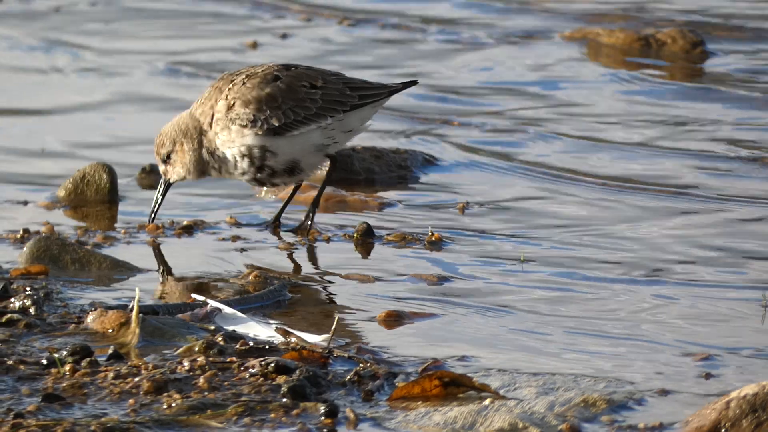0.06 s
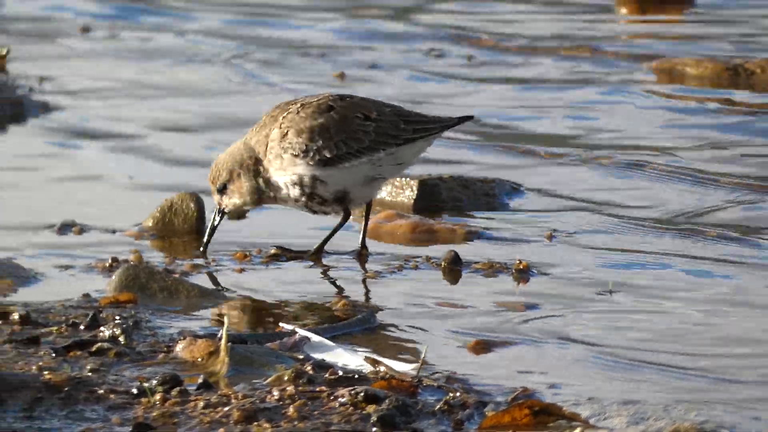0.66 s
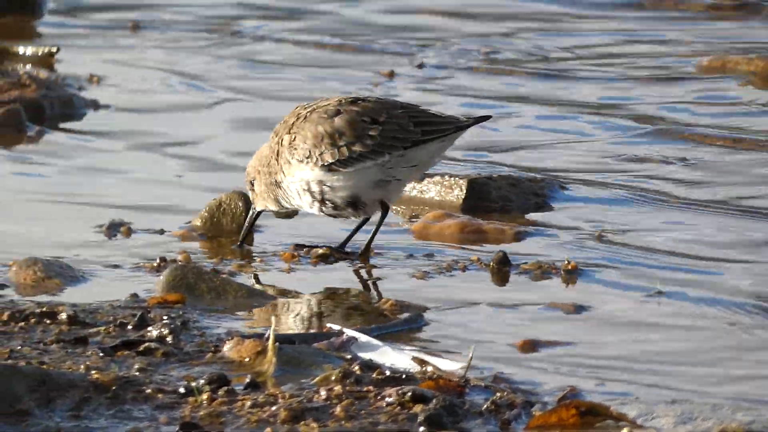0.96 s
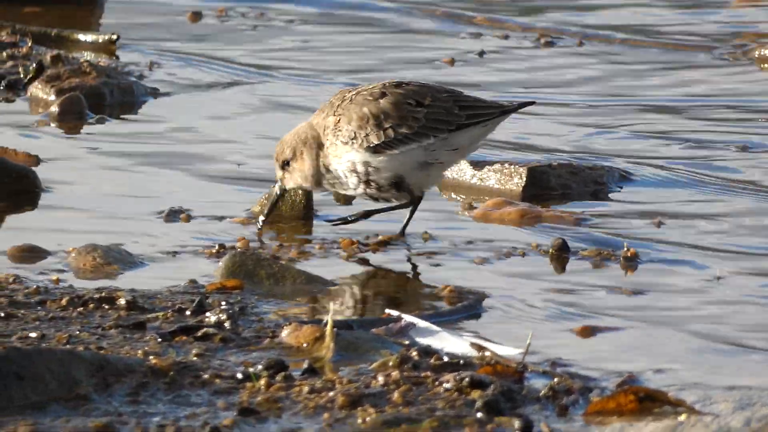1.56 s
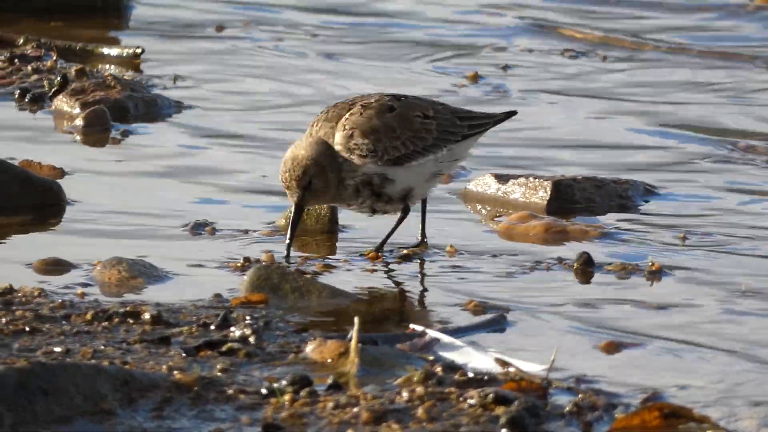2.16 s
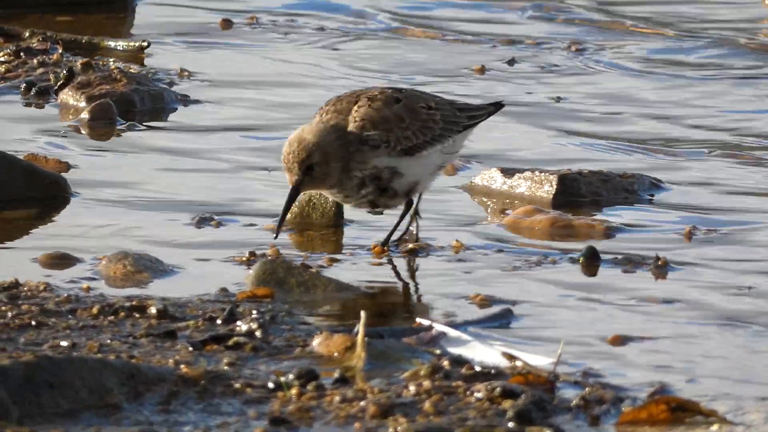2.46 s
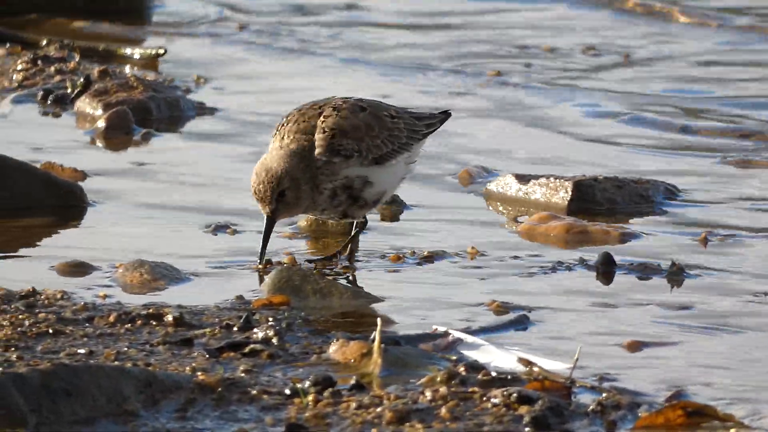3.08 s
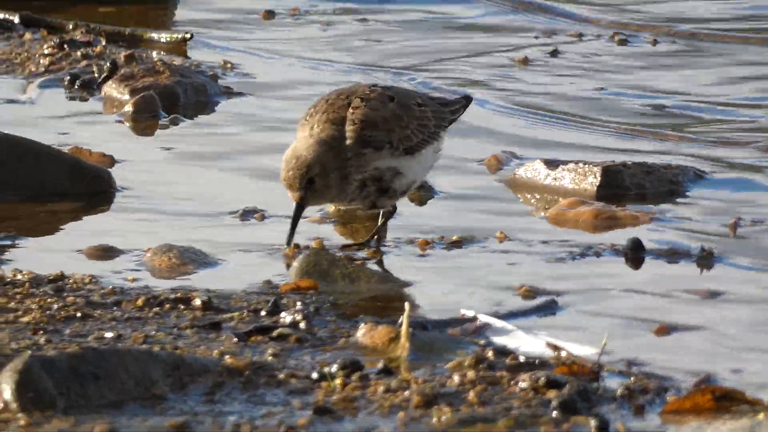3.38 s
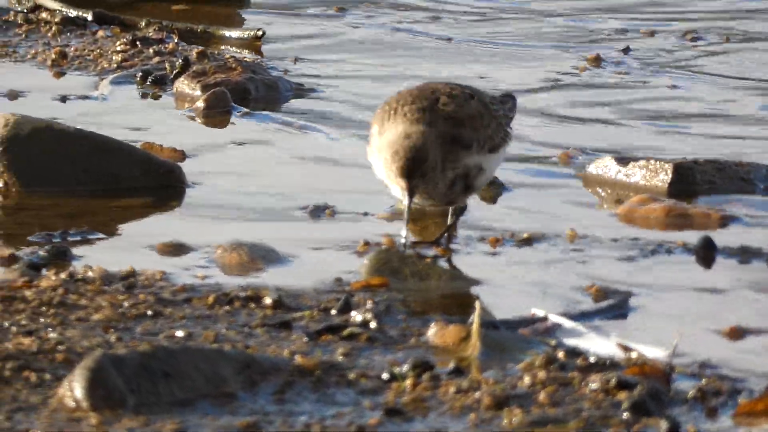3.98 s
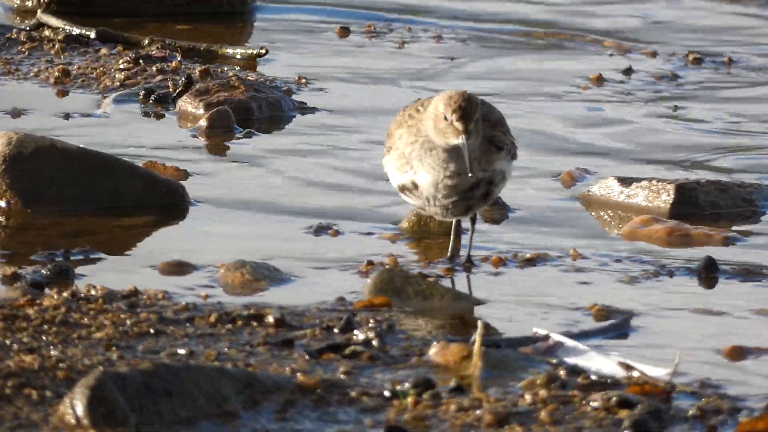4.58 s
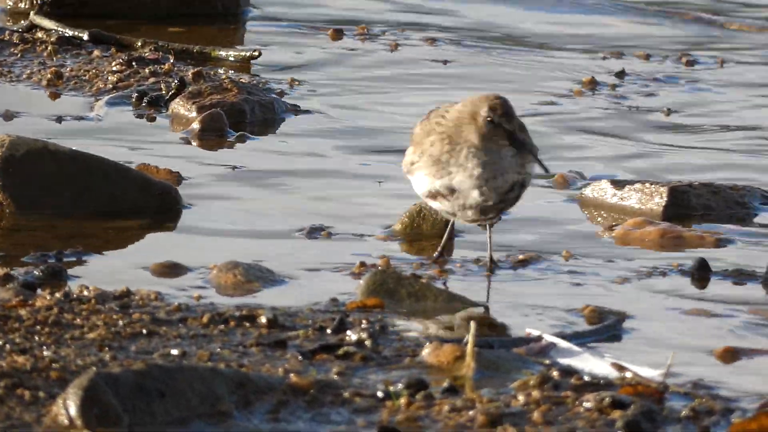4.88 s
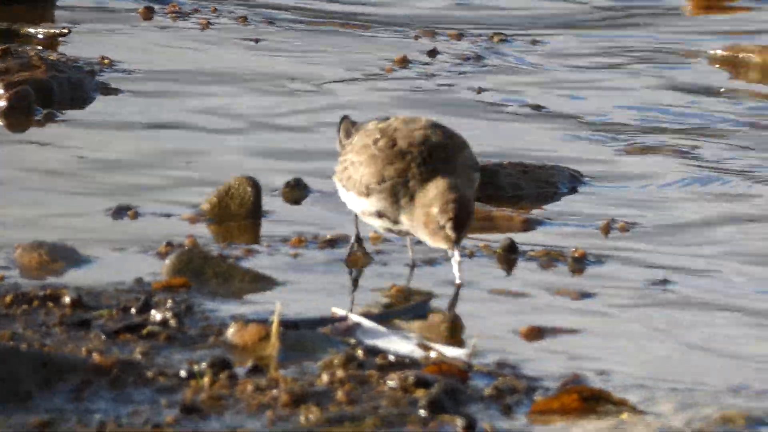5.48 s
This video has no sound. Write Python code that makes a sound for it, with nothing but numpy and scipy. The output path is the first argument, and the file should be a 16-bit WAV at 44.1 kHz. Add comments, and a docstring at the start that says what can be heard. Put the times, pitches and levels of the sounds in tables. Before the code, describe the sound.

After a moment of silence, the sound cuts in at about 0.3 seconds with a click, mostly on the right. Wind on an open muddy shore immediately buffets the microphone, making a low, rough rumble with fluttering rushes and dull thumps that shift between left and right. It is strongest and brightest around 0.9 seconds, with further gusts near 1.6 seconds and from 2.1 to 2.7 seconds. From about 3 seconds the wind slackens and turns deeper and lumpier, with separate bumps, surges and short lulls. It swells briefly near 4.2 seconds, is weakest between 4.5 and 5 seconds, then builds again with firm thumps around 5.4 and 5.6 seconds. Throughout, a faint, very rapid crackle of dry ticks thickens with the buffets, a few ticks standing out singly, and a very thin hiss lies beneath everything.

```python
"""A muddy shore, where wind buffets the two microphone ports of a camera; the sound cuts in with a click.
Turbulence acts as fluctuating pressure: large eddies rumble in both ports, smaller ones batter each
alone, and the finest flutter and rush in bursts. Strong wind is brighter; slack wind is deep and lumpy,
with single thumps, surges and lulls. Faint dry ticks fall on an even beat, about 94 a second, and
cluster with the buffets; under them lies a thin hiss."""
import sys
import numpy as np
from scipy import signal
from scipy.fft import rfft, irfft, next_fast_len
from scipy.io import wavfile
from scipy.ndimage import uniform_filter1d, map_coordinates

SR = 44100
rng = np.random.default_rng(int(sys.argv[2]) if len(sys.argv) > 2 else 0)


def materialize(psi):
    """Save the field psi as 16-bit PCM at rate SR to the path in sys.argv[1].

    A 1-D psi becomes a single channel; in a 2-D psi each row is a channel.
    """
    bounded = np.clip(np.atleast_2d(psi).T, -1, 1)
    quanta = np.round(bounded * 32767).astype(np.int16)
    wavfile.write(sys.argv[1], SR, quanta)


N = 248724


def amp(db):
    """Amplitude ratio of a level: tenfold for every 20 dB."""
    return 10 ** (np.asarray(db) / 20)


def unit_rms(x):
    """Normalisation to a mean square of one."""
    return x / np.sqrt(np.mean(x ** 2) + 1e-20)


def at_frequency(table, hz):
    """Interpolation on a logarithmic frequency axis."""
    f, values = np.transpose(table)
    return np.interp(np.log(hz + 1), np.log(f + 1), values)


def over_time(table):
    """Linear interpolation in time, one value a sample."""
    t, values = np.transpose(table)
    return np.interp(np.arange(N) / SR, t, values)


def wobble(rate):
    """Smooth random process: a spline through Gaussian knots, rate of them a second."""
    knots = rng.standard_normal(int(N * rate / SR) + 4)
    return map_coordinates(knots, [np.arange(N) * rate / SR])


def averaged(x, span_s):
    """A moving average smooths out fluctuations shorter than its span."""
    return uniform_filter1d(x, max(int(span_s * SR), 64))


def filtered(x, response):
    """Linear filtering: the spectrum is multiplied by a frequency response."""
    size = next_fast_len(N + SR // 2)
    return irfft(rfft(x, size) * response(np.fft.rfftfreq(size, 1 / SR)), size)[..., :N]


def panned(lean_db):
    """Constant-power law: two gains for a left-right level difference."""
    gains = amp(np.array([lean_db, -lean_db]) / 2)
    return gains / np.sqrt(np.mean(gains ** 2, axis=0))


def opening_click(age, level_db, decay_s, pitch_hz):
    """A pressure step dies away as a heavily damped oscillation, mostly on the right."""
    ring = np.exp(-age / decay_s) * np.cos(2 * np.pi * pitch_hz * age)
    return -amp(level_db) * (age > 0) * ring * panned(-11.5)[:, None]


# Likeness of the channels, greatest in the upper bass: f/Hz, correlation (-1 to 1)
CORRELATION = [(45, -0.34), (85, 0.37), (120, 0.54), (170, 0.98), (250, 0.68), (330, 0.39), (470, -0.14),
               (680, -0.43), (1000, -0.51), (2000, -.45), (3200, 0.026), (9000, 0.3)]


def stereo_pair(ports, spectrum):
    """Mid-side stereo: the balance of the ports' sum and difference sets the correlation."""
    def response(hz):
        angle = np.arccos(np.clip(at_frequency(CORRELATION, hz), -0.98, 0.98)) / 2
        return amp(at_frequency(spectrum, hz)) * [np.cos(angle), np.sin(angle)]

    mid, side = filtered(np.array([ports[0] + ports[1], ports[0] - ports[1]]), response)
    return unit_rms(np.array([mid + side, mid - side]))


def eddies(spectrum, bursts_db, span_s):
    """Intermittency: turbulent pressure comes in bursts, while its mean power over span_s holds steady."""
    pressure = stereo_pair(rng.standard_normal((2, N)) * amp(bursts_db), spectrum)
    power = np.mean(pressure ** 2, axis=0)
    mean_power = averaged(averaged(power, span_s), span_s)
    return pressure / np.sqrt(np.abs(mean_power) + 1e-9)


# Strength of the wind about its mean: t/s, level/dB
WIND_STRENGTH = [(0.33, 2), (0.55, 5.0), (0.9, 7), (1.02, 5.5), (1.2, 3.5), (1.45, 2), (1.62, 5), (1.82, 2),
                 (2.15, 5), (2.65, 4), (2.85, -0.5), (3.05, 1), (3.19, -4.5), (3.28, 1), (3.55, -5),
                 (3.72, -3), (3.95, -3), (4.22, 2), (4.45, -5), (4.58, -8.5), (4.74, -5), (4.98, -9),
                 (5.15, -5), (5.4, -1), (5.6, 1.5)]
# Lean of the wind toward one port, scaled for each eddy size: t/s, left-right level/dB
WIND_LEAN = [(0.4, 5.5), (1.1, 0), (1.7, -2), (1.85, 3.5), (2.3, 1.5), (2.9, 5.5), (3.35, 7), (3.55, -1.5),
             (4.15, 1.5), (4.7, 4), (4.95, -3.5), (5.1, 9), (5.38, -4), (5.55, 2)]
# Spectra of the eddies, largest to finest: f/Hz, relative level/dB
THROB_SPECTRUM = [(15, -28.5), (40, -22.5), (62, -13.5), (85, -5), (110, 4), (135, -0.5), (190, -30),
                  (400, -77)]
RUMBLE_SPECTRUM = [(50, -41.5), (95, -21), (125, -3.5), (165, 0.6), (225, -0.04), (300, -5), (450, -24.5),
                   (900, -88)]
BUFFET_SPECTRUM = [(100, -34.5), (190, -8.5), (270, -1.5), (380, 1), (490, -2.5), (620, -12.5),
                   (800, -25.5), (1200, -47.5), (2500, -89)]
FLUTTER_SPECTRUM = [(250, -31.5), (480, -0.5), (650, 4), (800, -1.5), (1000, -7), (1400, -19.5),
                    (2000, -37), (2800, -54), (5000, -87)]
RUSH_SPECTRUM = [(600, -22.5), (1100, -1.5), (1500, -3), (2000, -8.5), (2400, -16.5), (2900, -28.5),
                 (4000, -37.5), (8500, -53.5), (15000, -67.5)]


def wind(swirl):
    """Turbulence: smaller eddies sound higher, and more wind shifts the power from large to small."""
    wind_db, lean_db = over_time(WIND_STRENGTH), over_time(WIND_LEAN)
    throb = eddies(THROB_SPECTRUM, 0.8 * swirl, span_s=0.1)
    rumble = eddies(RUMBLE_SPECTRUM, 1.2 * swirl, span_s=0.14)
    buffet = eddies(BUFFET_SPECTRUM, 2.5 * swirl, span_s=0.085)
    flutter = eddies(FLUTTER_SPECTRUM, 3.2 * swirl, span_s=0.098)
    rush = eddies(RUSH_SPECTRUM, 2.5 * swirl + 4.8 * wobble(260), span_s=0.085)
    # Each size has a level in the mean wind and a slope in dB per dB of wind.
    return (throb * amp(-39.5 - 0.33 * wind_db) * panned(-1.8)[:, None]
            + rumble * amp(-28.0 + 0.29 * wind_db) * panned(0.1)[:, None]
            + buffet * amp(-25.0 + 0.42 * wind_db) * panned(0.58 * lean_db + 2.0)
            + flutter * amp(-37.5 + 1.175 * wind_db) * panned(1.2 * lean_db - 3.5)
            + rush * amp(-61.5 + 0.78 * wind_db) * panned(0.41 * lean_db - 0.1))


# Envelope common to the ticking and the fizz: t/s, level/dB
CRACKLE_LEVEL = [(0.33, -73.5), (0.66, -74.5), (0.88, -73), (1.2, -73), (1.45, -77), (1.85, -80),
                 (2.5, -77.5), (3.2, -80), (3.3, -76), (3.8, -82), (4.45, -79.5), (5.0, -83.5),
                 (5.4, -76.5), (5.6, -83.5)]
# Spectra of a tick and of the fizz between ticks: f/Hz, relative level/dB
TICK_SPECTRUM = [(400, -13), (1500, 4.5), (3000, 3), (4000, -2.5), (5000, -10), (6500, -18), (8500, -26.5),
                 (15000, -44)]
FIZZ_SPECTRUM = [(1200, -24), (2600, 1.5), (4000, -2.5), (6000, -7.5), (8500, -14.5), (15000, -29.5)]


def crackle(swirl, rate_hz, first_s, scatter_db, tick_db, fizz_db):
    """Amplitude modulation: eddies swell a periodic train of ticks; a fine fizz thickens in the gusts."""
    beats = np.round(np.arange(first_s, (N - 1) / SR, 1 / rate_hz) * SR).astype(int)
    draws = rng.uniform(-0.47, 1, (len(beats), 4)).T
    height, scatter = draws[:2], draws[2:]
    train = np.zeros((2, N))
    train[:, beats] = height * amp(scatter_db * scatter + 1.2 * swirl[:, beats])
    ticking = unit_rms(filtered(train, lambda hz: amp(at_frequency(TICK_SPECTRUM, hz))))
    fizz = eddies(FIZZ_SPECTRUM, 2.0 * swirl, span_s=0.04)
    fizz_gain = amp(fizz_db + 0.45 * over_time(WIND_STRENGTH))
    return amp(over_time(CRACKLE_LEVEL)) * (amp(tick_db) * ticking + fizz_gain * fizz)


def power_ratio(air, quick_s, slow_s):
    """Short-term over long-term mean-square pressure: how hard the air presses just now."""
    power = np.mean(air ** 2, axis=0)
    quick, slow = (np.abs(averaged(power, span_s)) + 1e-9 for span_s in (quick_s, slow_s))
    return quick / slow


# Spectrum of the microphones' hiss: f/Hz, relative level/dB
HISS_SPECTRUM = [(100, 3), (2500, 3.5), (5000, 3), (8300, -8), (9800, 4), (11500, -3), (15500, -7.5)]


def hiss(level_db):
    """Self-noise: the microphones add a thin, stationary broadband hiss."""
    return amp(level_db) * stereo_pair(rng.standard_normal((2, N)), HISS_SPECTRUM)


# Single eddies rolling over the ports: t/s, half duration/s, lift/dB, centre f/Hz
EDDY_SURGES = [(0.318, 0.027, 5.5, 379), (0.566, 0.015, 4, 637), (0.672, .04, 3, 3000),
               (0.682, 0.033, 3.5, 432), (0.77, .06, 4, 1400), (0.866, 0.036, 4, 1300),
               (0.868, .022, 4.5, 3400), (0.937, 0.017, 8, 1390), (1.115, 0.017, 3, 1202),
               (1.188, 0.05, 0, 4520), (1.194, 0.022, 6, 1490), (1.256, 0.13, 3.5, 190),
               (1.347, 0.006, 13.5, 1950), (1.399, 0.008, 13, 2100), (1.498, 0.039, 7, 223),
               (1.666, 0.043, 2.5, 230.7), (1.741, 0.021, 5.5, 200), (2.186, 0.011, 6.5, 523),
               (2.464, 0.022, 7, 161), (2.472, .02, -1, 4000), (2.56, .04, 4, 2000), (2.676, 0.045, 5, 684),
               (2.681, 0.036, 3, 2170), (2.863, 0.025, 11, 135.5), (2.975, 0.18, 3.5, 399),
               (3.191, 0.034, 15, 130), (3.308, 0.05, 4, 550), (3.428, 0.055, 7, 130),
               (3.466, .04, 5.5, 420), (3.592, 0.059, 6, 420), (3.655, .035, 10, 110), (3.963, .06, 3, 380),
               (4.03, 0.0066, 11, 1200), (4.246, 0.0081, 3.5, 1000), (4.284, .04, 5.5, 163),
               (4.428, 0.025, 12, 140), (4.425, 0.01, 11, 1490), (4.484, 0.052, 5.5, 430),
               (4.549, 0.075, 8, 130), (4.648, 0.03, 9, 170), (4.644, 0.012, 13.5, 1610),
               (4.773, 0.04, 5.5, 397), (4.961, 0.055, 11.5, 160.5), (4.956, 0.0252, 8.5, 1410),
               (5.062, 0.033, 6, 373), (5.139, 0.035, 3, 202.6), (5.18, 0.013, 13, 1000),
               (5.341, 0.024, 5, 710), (5.392, 0.025, 7, 314), (5.41, 0.015, 10, 1284),
               (5.479, 0.021, 7, 893), (5.547, 0.057, 2.5, 122)]
# Brief lulls, in which small eddies die first: t/s, half duration/s, depth/dB, corner f/Hz
WIND_LULLS = [(0.991, .02, 3, 400), (1.048, 0.038, 1, 100), (2.059, .02, 0.5, 60), (2.617, 0.012, 5.5, 80),
              (3.216, .025, 2.5, 380), (3.37, 0.013, 3.5, 200), (3.727, 0.031, 4.5, 200),
              (3.858, 0.033, 4.5, 60), (4.35, 0.024, 2, 300), (4.4, .012, 1.5, 100.5),
              (4.57, .025, 2.5, 380), (4.823, 0.015, 4, 300), (4.988, .022, 5, 330), (5.181, 0.036, 4, 60),
              (5.441, 0.016, 4, 150)]


def surges_and_lulls(x, width_octaves=0.62, spared_below_hz=75, frame=512):
    """Time-varying filtering: a surge lifts the band about its pitch, a lull lowers all above its own."""
    hz, t, spectra = signal.stft(x, SR, nperseg=frame)
    bell = lambda centre_s, half_s: np.exp(-((t - centre_s) / half_s) ** 2)
    octaves = lambda pitch: np.log2((hz[:, None] + 1) / pitch)
    band = lambda pitch: np.exp(-(octaves(pitch) / width_octaves) ** 2)
    shelf = lambda pitch: (1 + np.tanh(2 * octaves(pitch) / width_octaves)) / 2
    lift_db = sum(db * band(pitch) * bell(s, half) for s, half, db, pitch in EDDY_SURGES)
    lull_db = sum(db * shelf(pitch) * bell(s, half) for s, half, db, pitch in WIND_LULLS)
    _, change = signal.istft(spectra * (amp(lift_db - lull_db) - 1), SR, nperseg=frame)
    return x + filtered(change[:, :N], lambda f: 1 - np.exp(-(f / spared_below_hz) ** 4))


# The hardest single puffs: t/s, relative peak level/dB, left-right level/dB, pitch f/Hz
PUFF_EVENTS = [(0.362, -11.5, 4, 322), (0.457, -13, 10, 336), (0.546, -17, -0.5, 650),
               (0.575, -20, 12.5, 660), (0.649, -26, -4, 597), (0.685, -18.5, -2, 610),
               (0.781, -20, 13, 644), (0.843, -17, 3.5, 292), (0.875, -24.5, 1, 780),
               (0.928, -16, 4.5, 650), (0.946, -13, -5, 306), (1.097, -28.5, 6, 650),
               (1.202, -17.5, 0.5, 315), (1.419, -15, 6, 287), (1.510, -16, 9, 290), (1.648, -14, -2, 280),
               (1.734, -15.5, -1, 281), (1.87, -21, 1, 620), (1.931, -13, -2.5, 340), (2.015, -30, 14, 613),
               (2.156, -18, 15, 610), (2.187, -12, 2, 335), (2.215, -26, 10, 630),
               (2.325, -14.5, -2.5, 253), (2.461, -13, 9, 290), (2.495, -12.5, 11, 481),
               (2.549, -22, 15, 670), (2.651, -23.5, 10, 624), (2.659, -14.5, 6.5, 255),
               (2.818, -27, 10, 643), (2.861, -18.5, 5, 249), (3.193, -20, 3, 210), (3.233, -23, -3, 625),
               (3.429, -33.5, 7, 620), (3.554, -15, 9.5, 340), (4.104, -27.5, 6.5, 700),
               (4.247, -30, -3, 760), (4.323, -28, 16, 646), (4.421, -13, -2.5, 250),
               (4.423, -22, 4.5, 520), (4.485, -30.5, 17.5, 615), (4.655, -20, 0, 224),
               (4.708, -26.5, 14, 600), (4.801, -29, 9, 615), (4.965, -20, -8, 201),
               (5.062, -13, 10.5, 337), (5.305, -29.5, -5, 670), (5.338, -23.5, 8, 635),
               (5.418, -10.5, -1.5, 306), (5.585, -10.5, 1, 356)]
# Spectrum of a puff pitched at PUFF_HZ: f/Hz, relative level/dB
PUFF_SPECTRUM = [(100, -34), (200, -16), (400, 1.5), (650, 9), (900, -7), (1400, -21), (2000, -37.5),
                 (2800, -54.5), (5000, -76), (9000, -102)]
PUFF_HZ = 650


def puffs(rise_s, gain_db):
    """Eddy scaling: one strong eddy gives a dull thump; a larger one is deeper, more alike in both ports."""
    out = np.zeros((2, N + SR))
    length = SR // 20
    age = np.arange(length) / SR / rise_s
    envelope = age * np.exp(-age)
    hz = np.fft.rfftfreq(2 * length, 1 / SR)
    for s, db, lean_db, pitch in PUFF_EVENTS:
        left, independent = rng.standard_normal((2, length))
        alike = np.clip(at_frequency(CORRELATION, pitch), -1, 1)
        right = alike * left + np.sqrt(1 - alike ** 2) * independent
        burst = np.pad(envelope * np.array([left, right]), ((0, 0), (length, 0)))
        puff = irfft(rfft(burst) * amp(at_frequency(PUFF_SPECTRUM, hz * PUFF_HZ / pitch)))
        puff /= np.abs(puff).max(axis=1, keepdims=True)
        onset = round(s * SR)
        out[:, onset - length:onset + length] += amp(db + gain_db) * panned(lean_db)[:, None] * puff
    return out[:, :N]


# The clearest ticks: t/s, relative level/dB, left-right level/dB
TICK_EVENTS = [(0.641, -58, -16), (0.874, -58.5, -2), (1.133, -52.5, -10.5), (1.186, -58.5, 12),
               (1.6233, -54, -0.5), (1.698, -57, 12), (2.114, -56, -10.5), (2.456, -65, 7.5),
               (2.477, -60, -0.5), (2.658, -61, -12), (2.669, -53.5, 11), (2.798, -58, 0), (2.82, -60.5, 1),
               (2.989, -60, 16), (3.003, -61.5, 5), (3.01, -57, -9), (3.127, -60, -1), (3.245, -57, -13.5),
               (3.2663, -56, -5), (3.298, -59, 10), (3.544, -52, 13), (3.5647, -53, 17),
               (3.7572, -58.5, -7), (3.916, -62, 15), (4.076, -56, 3), (4.2573, -59, -6), (4.29, -62, 12),
               (4.408, -58.5, -18), (4.45, -63, 9), (4.514, -61.5, 5), (4.6737, -64, 3), (4.728, -61.5, 6),
               (4.74, -59.5, 2), (4.749, -61, 3), (4.952, -61, 12), (5.24, -58, -11), (5.581, -52.5, 7)]


def clear_ticks(gain_db):
    """Impulse response: a broad spectrum makes each tick a fraction of a millisecond long."""
    impulses = np.zeros((2, N))
    for s, db, lean_db in TICK_EVENTS:
        impulses[:, round(s * SR)] = rng.choice([-1, 1]) * amp(db + gain_db) * panned(lean_db)
    return filtered(impulses, lambda hz: amp(at_frequency(TICK_SPECTRUM, hz)))


def scene():
    """Superposition: all sources add; one swirl, partly common to both ports, drives wind and crackle."""
    common = 0.42 * wobble(45) + 0.55 * wobble(190)
    swirl = common + 0.65 * np.array([wobble(130), wobble(130)])
    air = surges_and_lulls(wind(swirl))
    ticking = crackle(swirl, rate_hz=93.75, first_s=0.0023, scatter_db=0.3, tick_db=0.15, fizz_db=-5)
    clustering = power_ratio(air, quick_s=0.023, slow_s=0.5) ** 0.25
    ticking = surges_and_lulls(ticking) * clustering
    thumps = puffs(rise_s=0.0021, gain_db=2.5)
    return air + thumps + ticking + clear_ticks(gain_db=16.5) + hiss(level_db=-82.5)


def record(dry):
    """Gating and band limiting: after silence the sound cuts in with a click, all of it low-passed."""
    start_s, rise_s = 0.309, 0.00044
    cutoff_hz, edge_hz = 15600, 250
    age = np.maximum(np.arange(N) / SR - start_s, 0)
    gate = 1 - np.exp(-age / rise_s)
    click = opening_click(age, level_db=-16.0, decay_s=0.00078, pitch_hz=400)
    return filtered(dry * gate + click, lambda hz: (1 - np.tanh((hz - cutoff_hz) / edge_hz)) / 2)


dry = scene()
out = record(dry)
materialize(out)
```